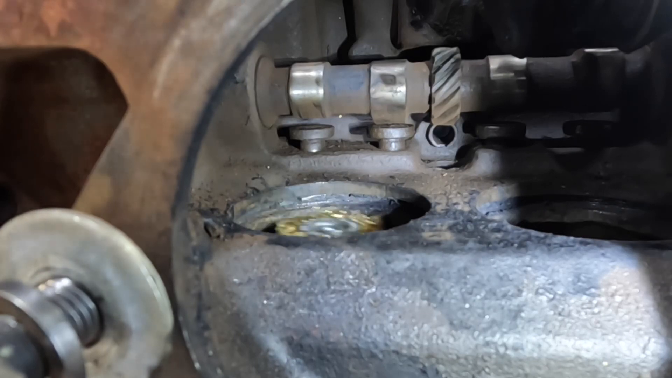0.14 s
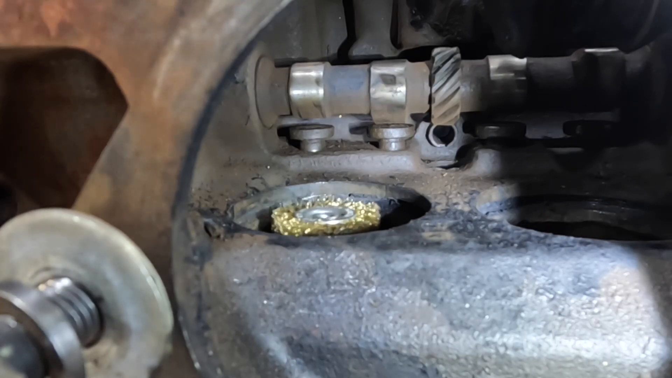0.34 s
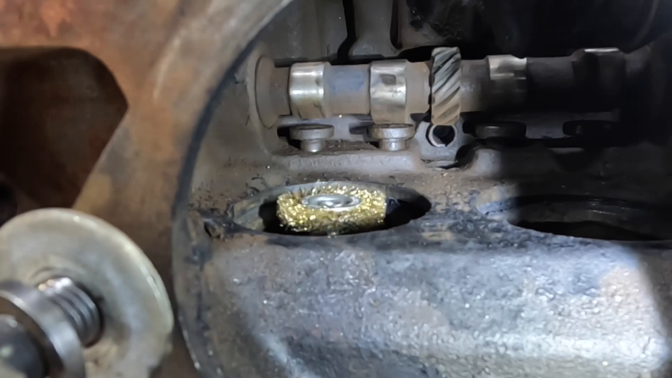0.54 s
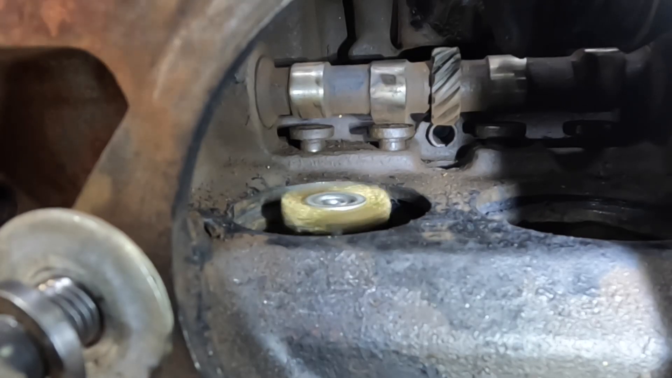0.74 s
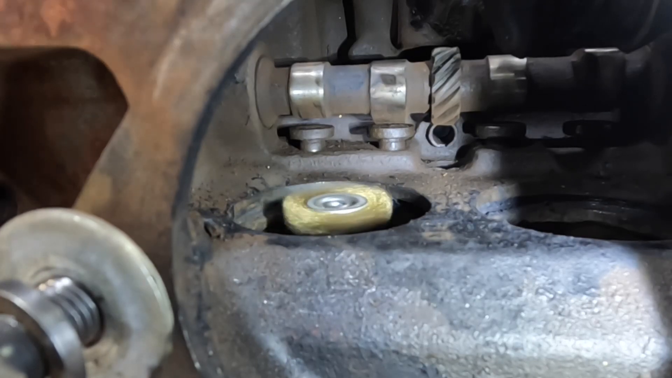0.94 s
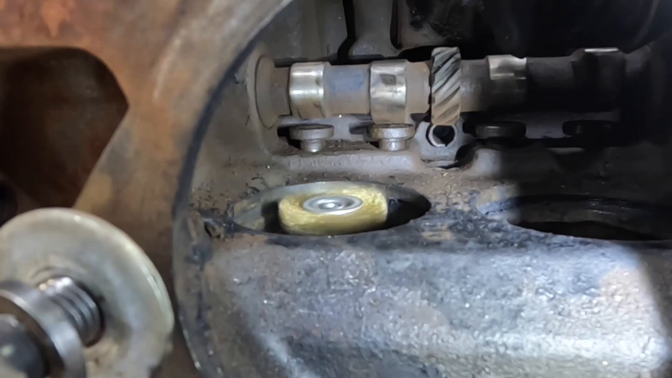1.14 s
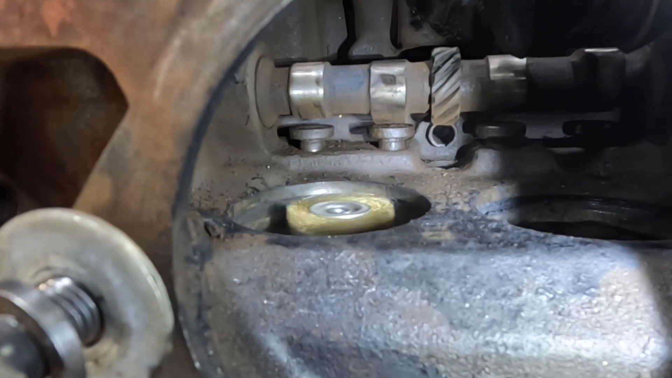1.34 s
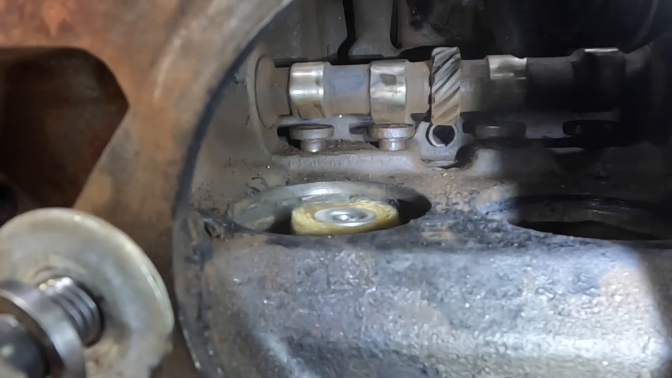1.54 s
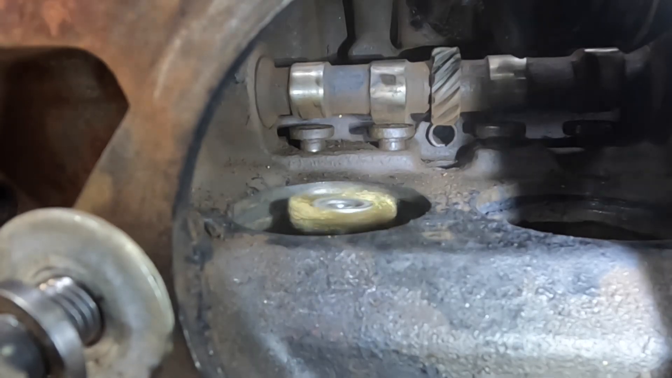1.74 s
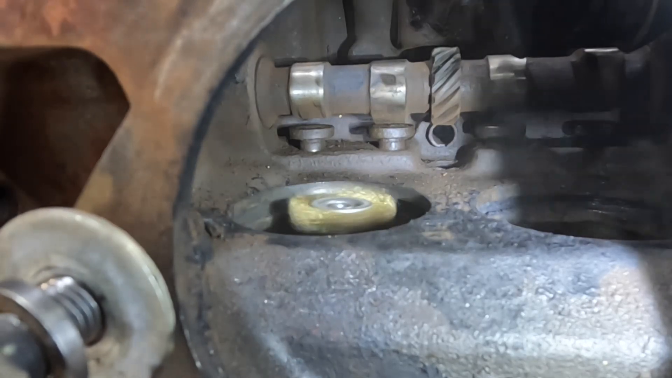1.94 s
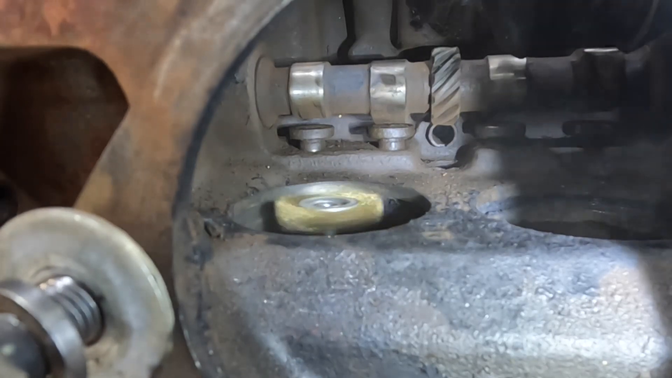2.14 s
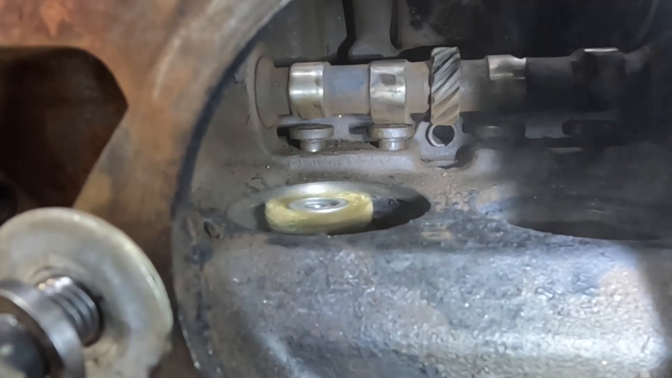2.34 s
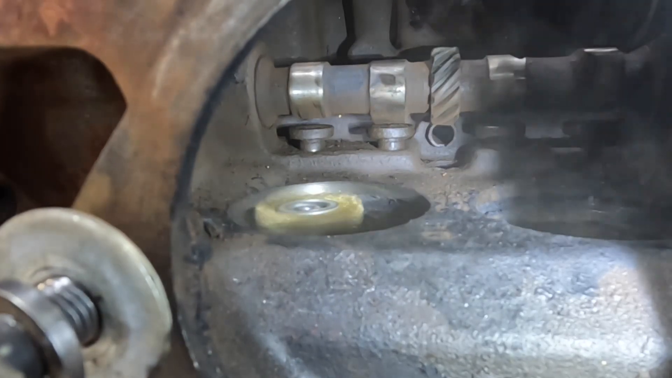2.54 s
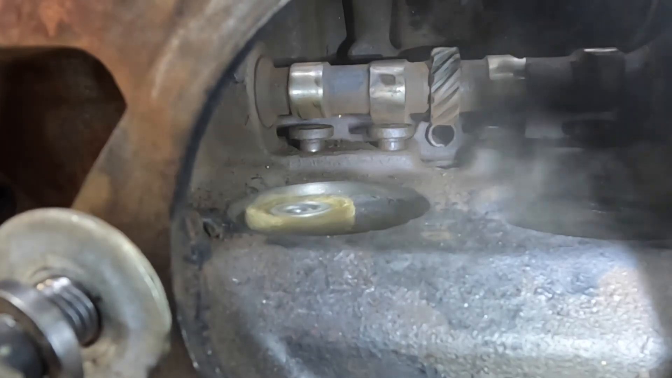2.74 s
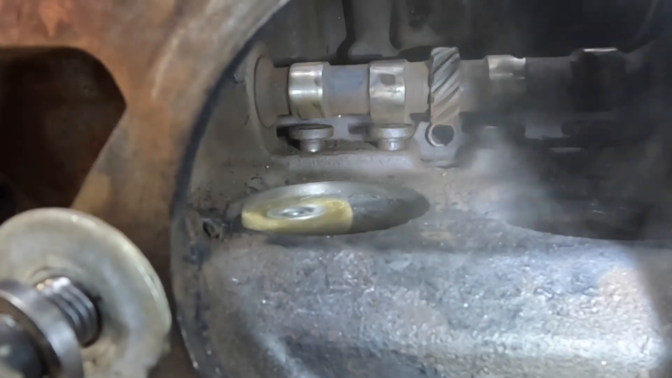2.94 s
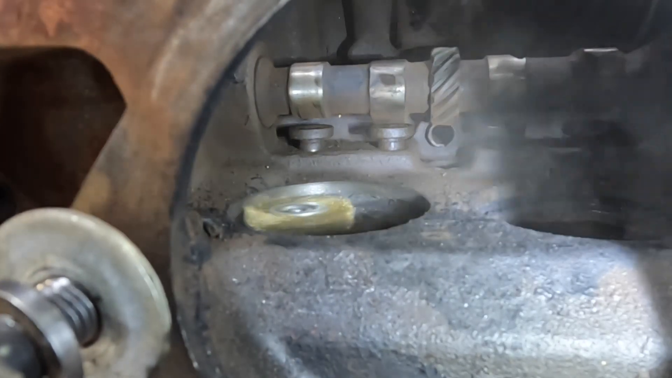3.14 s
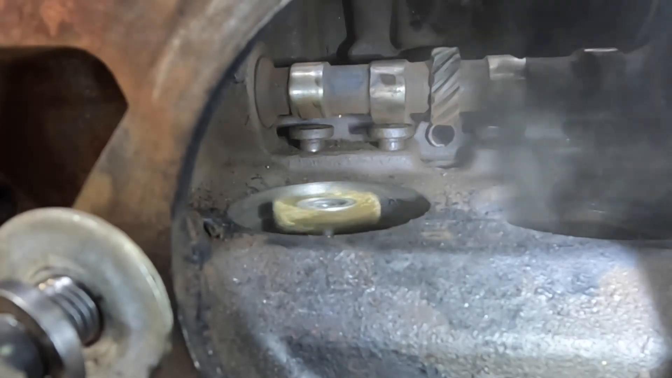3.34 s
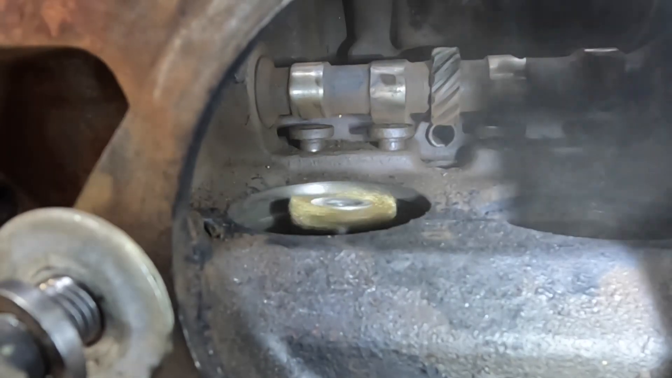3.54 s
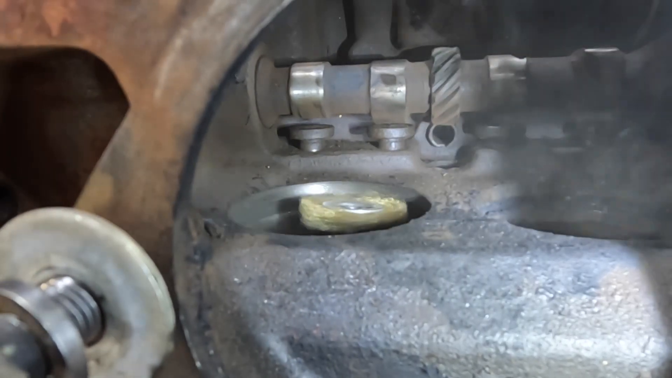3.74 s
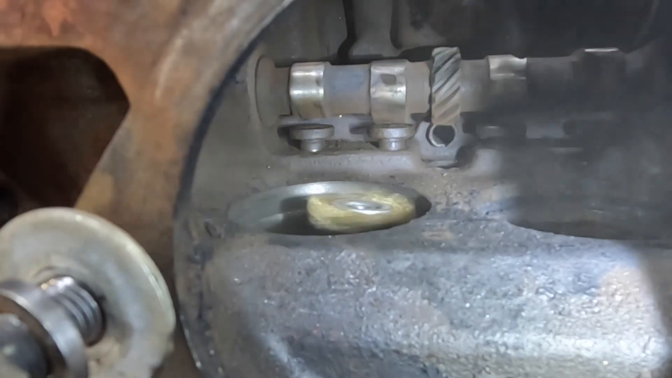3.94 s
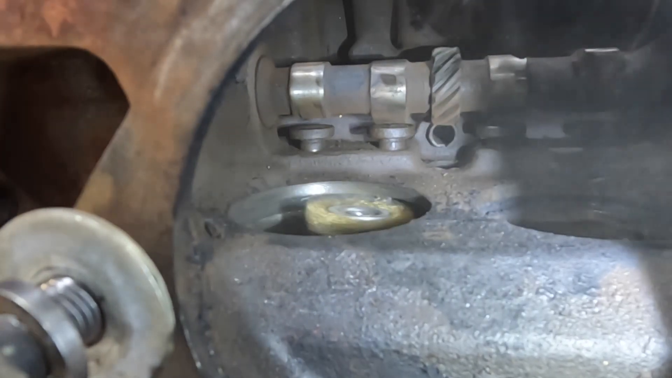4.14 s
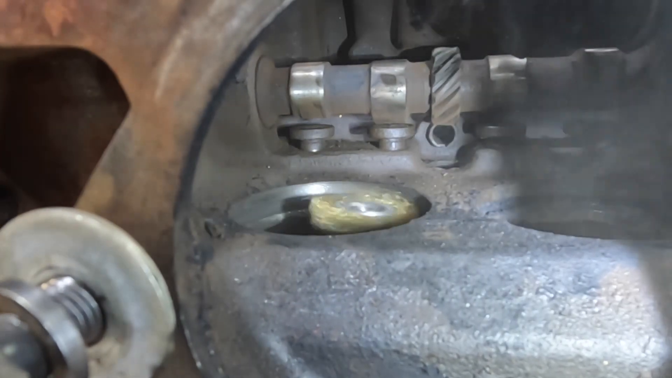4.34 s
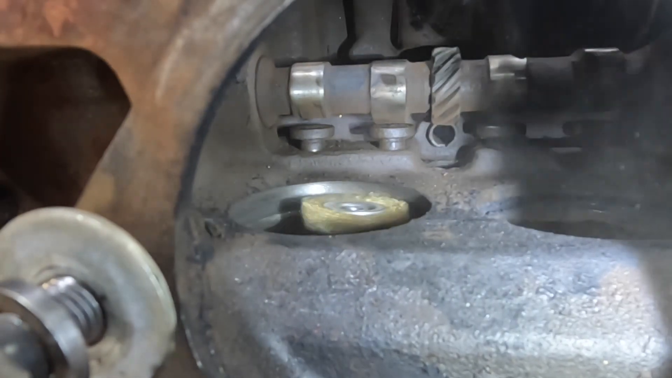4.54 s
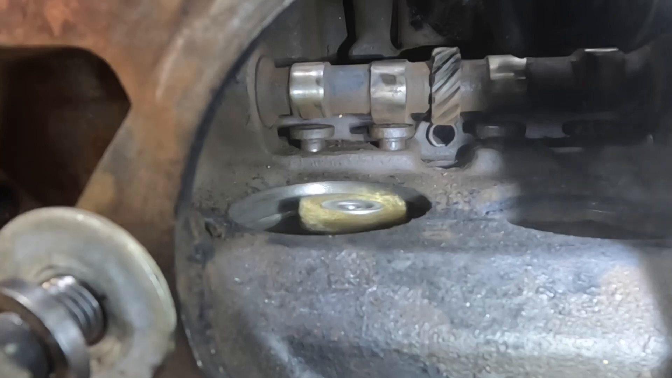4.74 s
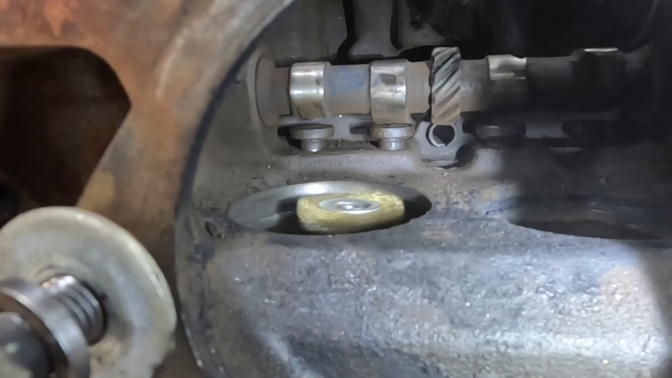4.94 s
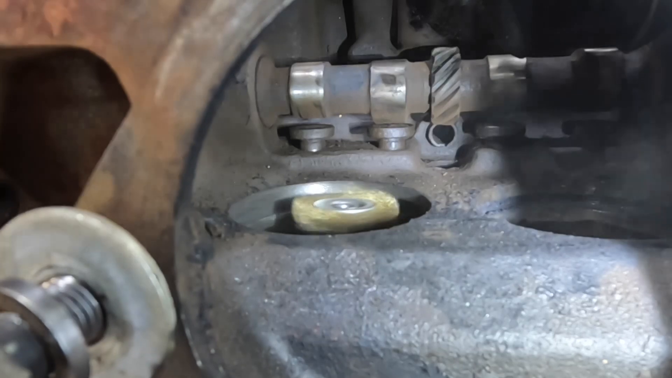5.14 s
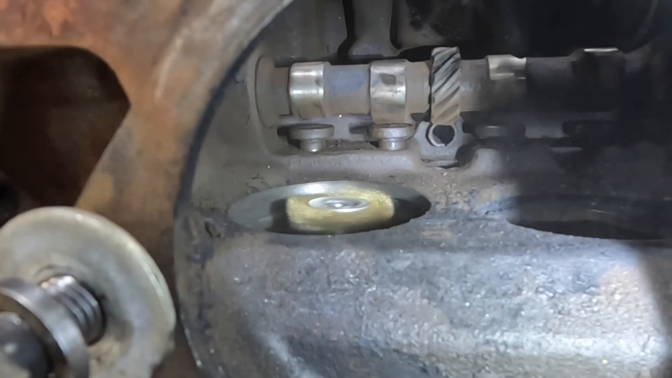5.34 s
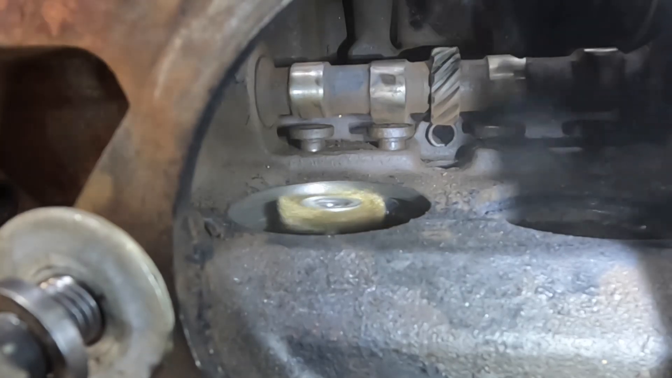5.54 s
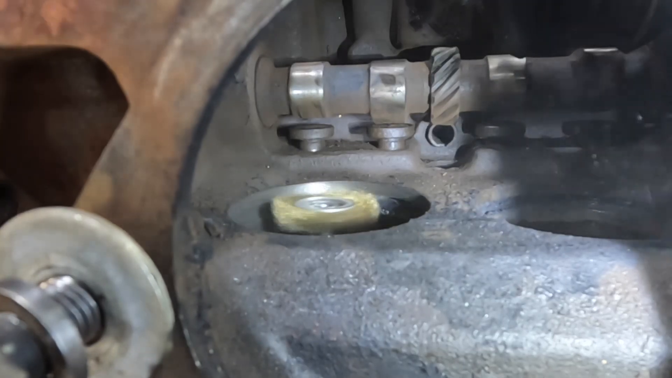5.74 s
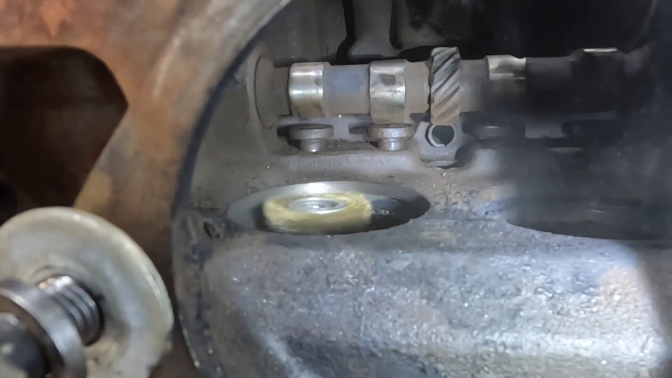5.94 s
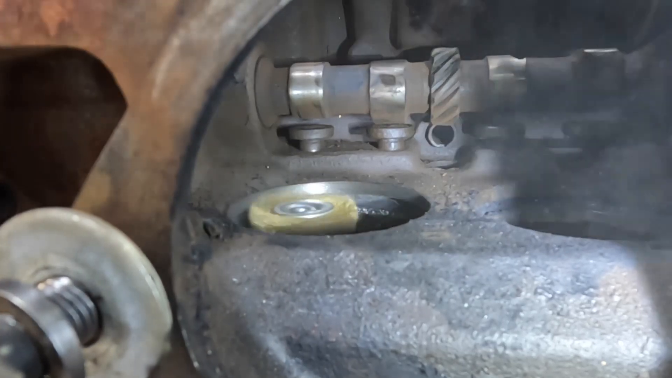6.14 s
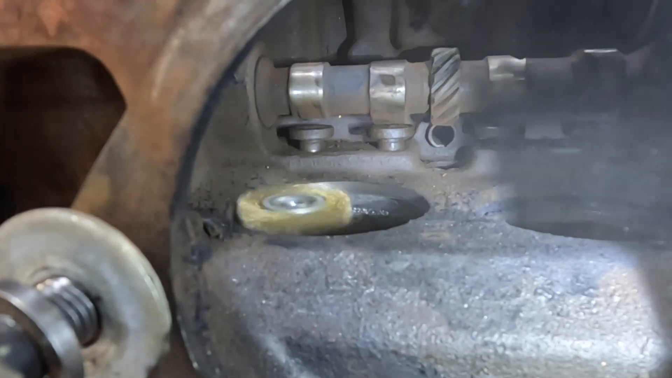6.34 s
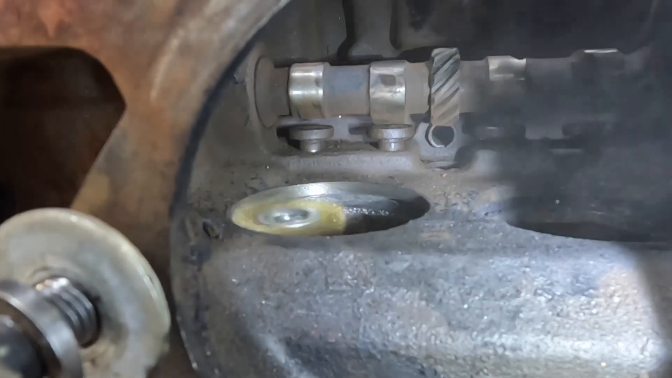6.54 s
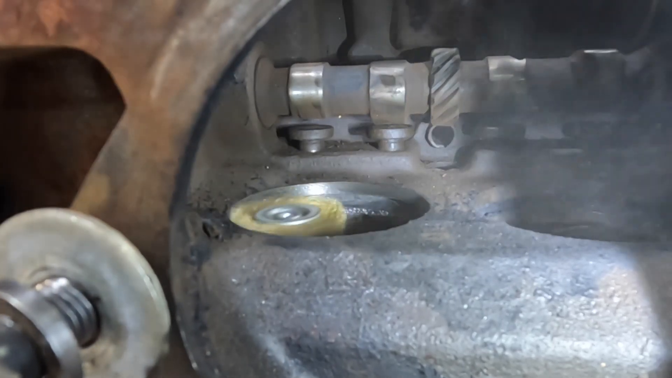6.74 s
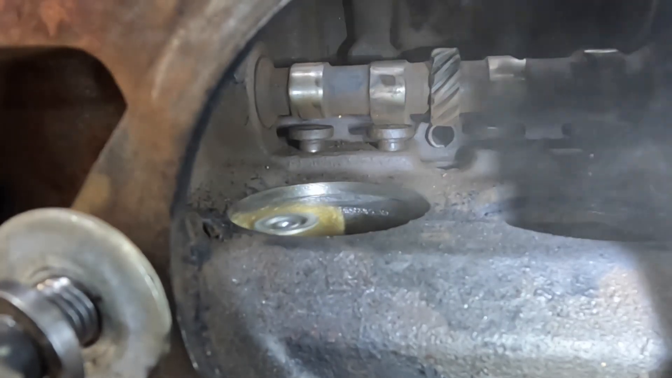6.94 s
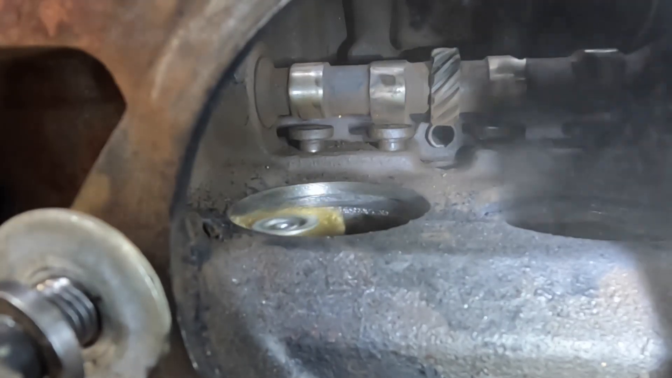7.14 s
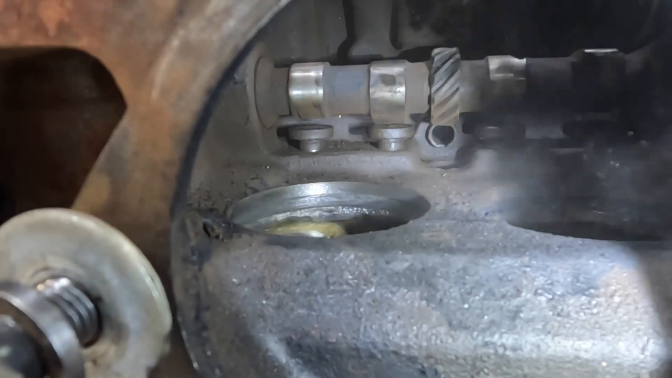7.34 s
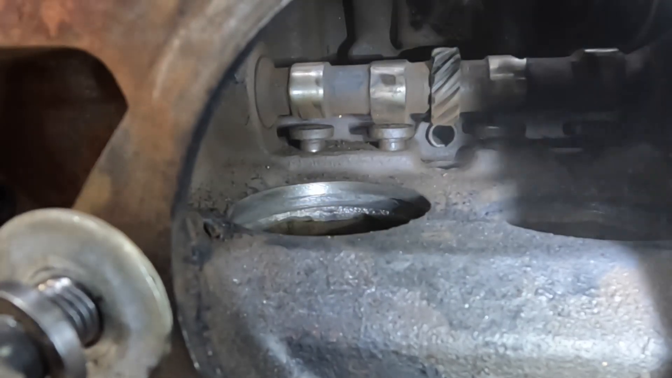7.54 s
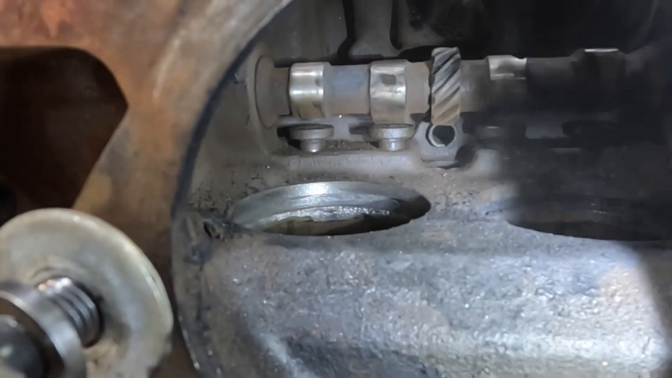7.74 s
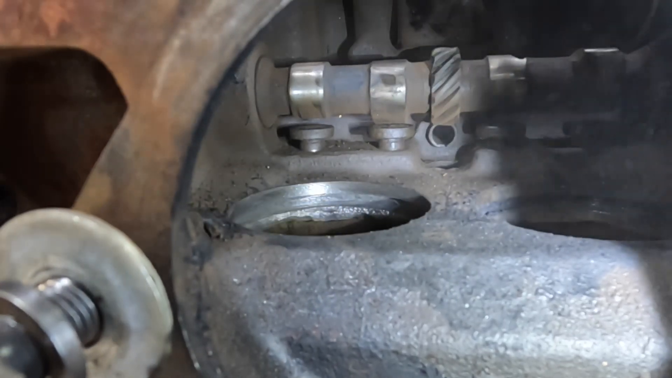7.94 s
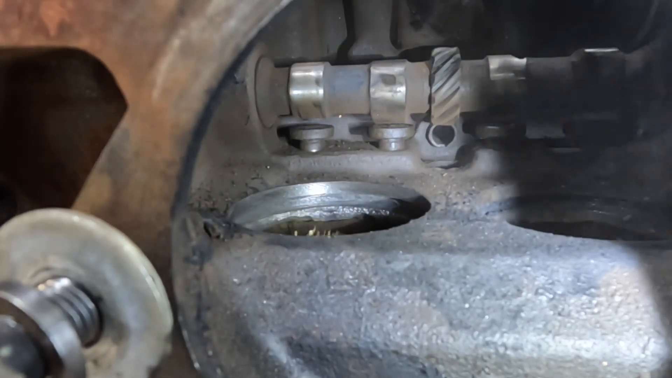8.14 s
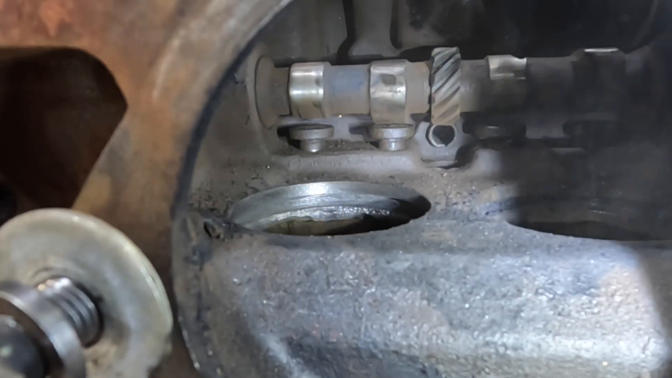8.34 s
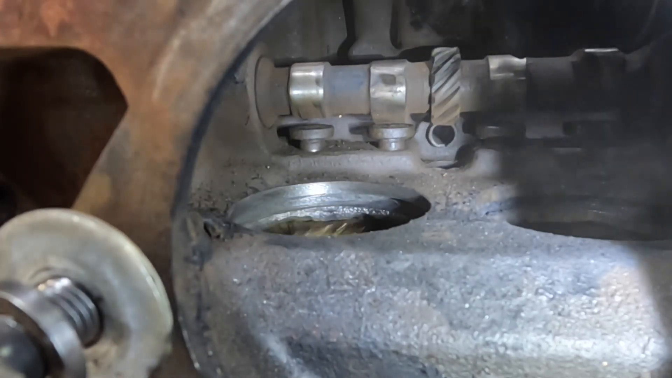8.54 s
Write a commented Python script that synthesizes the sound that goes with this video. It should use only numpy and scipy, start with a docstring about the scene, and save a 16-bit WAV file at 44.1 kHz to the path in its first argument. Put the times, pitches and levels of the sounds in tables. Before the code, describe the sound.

A close microphone in a reverberant workshop with soft low background noise. From 0 to 0.6 seconds, a wire brush makes small, dry, dull ticks against iron, with short gritty bristle scrapes at about 0.3 and 0.55. At 0.62 the air valve opens with a low puff, a few soft bumps of air and a brief low rush, stronger at right. A pneumatic drill instantly whines, a stack of high tones over dense exhaust hiss, brightest with scratch in the first second. The pitch rises quickly, then sags by about 3 seconds and wavers under load until 7.5, its tones trading strength while narrow noisy metallic rings swell and fade. At 7.51 it shuts off: the tone falls in a rapid chirp under 0.2 seconds, ringing out in an echo of about a second. Near 8.4 come two very faint touches over quiet background.

```python
"""A small wire brush in an air drill taps and scrapes the bore of an iron engine block in a workshop.
The valve opens with a puff and a brief low rush; the four-vane rotor whines as a stack of tones over
coloured exhaust noise, bright bristle scratch and narrow noisy rings, sagging in pitch under load.
At shut-off the vane tone drops in one falling chirp that rings out in the shop's noise-tail echo;
a last pair of faint touches follows over the background noise."""
import sys
import numpy as np
from scipy import signal
from scipy.fft import rfft, irfft, next_fast_len
from scipy.io import wavfile

SR = 44100
rng = np.random.default_rng(int(sys.argv[2]) if len(sys.argv) > 2 else 0)


def master_out(mix):
    """Clip the mix to full scale and print it as 16-bit PCM to the path in sys.argv[1]."""
    frames = np.transpose(np.atleast_2d(mix))
    ceiling = np.clip(frames, -1, 1)
    pcm = np.round(ceiling * 32767).astype(np.int16)
    wavfile.write(sys.argv[1], SR, pcm)


N = 378366
SIZE = next_fast_len(N)
VALVE_OPEN_S, VALVE_SHUT_S = .62, 7.514


def amp(db):
    """dB to gain."""
    return 10 ** (np.asarray(db) / 20)


def rms_one(x):
    """Scale to rms 1."""
    return x / np.sqrt(np.mean(x ** 2) + 1e-20)


def in_time(rows):
    """Columns of a timed table, interpolated to every sample."""
    s, *columns = np.transpose(rows)
    return [np.interp(np.arange(N) / SR, s, column) for column in columns]


def at_hz(points, hz):
    """Read a table on a log-frequency axis."""
    table = np.array(points)
    return np.interp(np.log(hz + 1), np.log(table[:, 0]), table[:, 1])


def drift(rate_hz):
    """Slow chance of spread 1: noise through two equal one-pole low-passes at every 40th sample."""
    r = np.exp(-80 * np.pi * rate_hz / SR)
    white = rng.standard_normal(N // 40 + 2002)
    slow = signal.lfilter([1], [1, -2 * r, r * r], white)[2000:]  # the filter has settled by then
    return np.interp(np.arange(N) / 40, np.arange(len(slow)), rms_one(slow))


def ring(clicks, hz, t60):
    """Two-pole resonator: a unit click sets a decaying sine of starting height 1 ringing."""
    r, w = amp(-60 / (t60 * SR)), 2 * np.pi * hz / SR
    return signal.lfilter([0, np.sin(w)], [1, -2 * r * np.cos(w), r * r], clicks + 1e-18)


def butter(x, edge_hz, kind="low"):
    """Gentle second-order filter."""
    return signal.sosfilt(signal.butter(2, edge_hz, kind, fs=SR, output="sos"), x)


def bands(length, low_hz, step):
    """Overlapping windows, step octaves apart, summing to 1: (centre Hz, window)."""
    hz = np.fft.rfftfreq(length, 1 / SR)
    place = np.log2(np.maximum(hz, low_hz) / low_hz) / step
    for k in range(int(place[-1]) + 2):
        yield low_hz * 2 ** (k * step), np.cos(np.pi / 2 * np.clip(place - k, -1, 1)) ** 2


def coloured(colour, modes=()):
    """Spectrum of a noise of rms 1, shaped by a colour curve and lifted at each mode."""
    hz = np.fft.rfftfreq(SIZE, 1 / SR)
    db = at_hz(colour, hz)
    for f, width, lift in modes:
        db = db + lift / (1 + (2 * (hz - f) / width) ** 2)
    white = rfft(rng.standard_normal(SIZE))
    return rfft(rms_one(irfft(amp(db) * white, SIZE)))


def background():
    """Coloured background noise, sinking at first, rising at the end, with small wandering."""
    # Colour of the shop. Each row: frequency in Hz, relative density in dB.
    shop_colour = [(15, -36), (25, -3), (99, -10.5), (136, -8), (183, -12), (322, -15), (359, -14.5),
                   (410, -21), (919, -37.5), (1140, -29), (1950, -38), (6210, -41.5), (15500, -67.5)]
    # Loudness of the shop. Each row: time in seconds, level in dB.
    shop_level = [(0, -40), (.45, -46.5), (.62, -49), (8.0, -50), (8.3, -53), (8.58, -45.5)]
    [level_db] = in_time(shop_level)
    return irfft(coloured(shop_colour), SIZE)[:N] * amp(level_db + 2.0 * drift(12))


def knocks(chatter_s=0.0056, contact_db=-26.5):
    """Each touch of the shank is a short chatter of contacts that strikes every mode of the iron."""
    # Brush shank touching the iron. Each row: start in seconds, relative level in dB,
    # extra lift in dB of the modes above 5500 Hz.
    touches = [(0.0593, -33.5, -18), (0.0844, -41.5, -15.5), (0.19, -31.5, -12.5), (0.267, -36.5, -13.5),
               (0.3731, -41, 7.5), (0.3894, -47, -9.5), (0.5357, -40.5, -8), (0.561, -42.5, -1.5),
               (8.4173, -39, -18), (8.429, -37.5, -19)]
    # Modes of the iron. Each row: frequency in Hz, relative level in dB, T60 in seconds.
    iron_modes = [(1180, -5, .012), (1900, -1, .012), (2480, -3, .01), (3080, -6.5, .008), (3850, -6, .008),
                  (4400, -7.5, .007), (5000, -7, .008), (5670, -4.5, .006), (6300, -5, .007),
                  (7500, 3.5, .007), (8600, -5.5, .004)]
    out, t = np.zeros(N), np.arange(900) / SR
    chatter = rng.standard_normal((len(touches), len(t))) * np.exp(-t / chatter_s)
    for hz, mode_db, t60 in iron_modes:
        push = np.zeros(N)
        for (s, touch_db, bright_db), contacts in zip(touches, chatter):
            db = touch_db + mode_db + contact_db + (hz > 5500) * bright_db
            push[round(s * SR):][:len(t)] += amp(db) * contacts
        out += ring(push, hz, t60)
    return butter(out, 9000)


def drag(grain_db=3):
    """Bristles dragged along the wall: grainy coloured noise that swells and fades per stroke."""
    # Strokes. Each row: swell start, loudest point and fade end in seconds, level in dB.
    strokes = [(0.25, .32, .375, -47.5), (0.531, 0.536, .556, -46.5), (0.547, 0.564, .62, -50),
               (8.4, 8.422, 8, -69.5)]
    # Colour of the scratch. Each row: frequency in Hz, relative density in dB.
    scratch_colour = [(530, -66.5), (900, -32), (1240, -3.5), (2420, -9), (2570, -8.5), (7490, -2.5),
                      (12400, -20), (15000, -43.5)]
    t, envelope = np.arange(N) / SR, 0
    for start, top, end, db in strokes:
        envelope = envelope + amp(db) * np.interp(t, (start, top, end), (0, 1, 0)) ** .7
    noise = irfft(coloured(scratch_colour), SIZE)[:N]
    return envelope * noise * amp(grain_db * drift(150))


def valve(lag_s=0.):
    """Seconds since the valve opened, and a gate that is open while air flows."""
    t = np.arange(N) / SR - VALVE_OPEN_S
    to_nearest_edge = np.minimum(t - lag_s, VALVE_SHUT_S - VALVE_OPEN_S - t)
    return np.maximum(t, 0), np.clip(to_nearest_edge / .0012, 0, 1)


def puffs():
    """Short low pushes of air on the microphone, each a click into a fast-dying resonance."""
    # Air pushes. Each row: start in seconds, relative level in dB, pitch in Hz, T60 in seconds.
    pushes = [(.6215, -15, 1100, .008), (.621, -8, 468, 0.014), (.632, -1.5, 170, 0.014),
              (.657, -13.5, 118.8, .03), (0.695, -16, 80.6, 0.041), (.722, -22.5, 70, .05),
              (0.762, -8, 60, 0.033), (0.799, -15.5, 60, 0.041), (.84, -20, 50, .06),
              (7.511, -22, 60.3, 0.038)]
    out = np.zeros(N)
    for s, db, hz, t60 in pushes:
        click = np.zeros(N)
        click[round(s * SR)] = amp(db)
        out += ring(click, hz, t60)
    return butter(out, 1500)


def buffet(start_db=-30, fade_db_per_s=33.5, lumps_db=4):
    """Exhaust air buffeting the microphone: lumpy low noise that fades after the start."""
    since, gate = valve()
    low = butter(rng.standard_normal(N), [35, 330], "band")
    return gate * amp(start_db - fade_db_per_s * since + lumps_db * drift(30)) * rms_one(low)


def fine_ripple(spectrum, ripple_db=4.5, spacing_hz=110, hold_s=1.064):
    """Fine random ripple in the noise spectrum, crossfading slowly between chance patterns."""
    hz, t, out = np.fft.rfftfreq(SIZE, 1 / SR), np.arange(SIZE) / SR, 0
    chance = rng.standard_normal((14, 600))
    for k in range(int(t[-1] / hold_s) + 2):
        pattern = np.interp(hz / spacing_hz, np.arange(600), chance[k])
        pattern = pattern * np.clip(hz / 2500, 0, 1)  # weaker ripple in the lows
        share = np.clip(1 - np.abs(t / hold_s - k), 0, 1)  # crossfade between patterns
        out = out + share * irfft(spectrum * amp(ripple_db * pattern), SIZE)
    return rfft(rms_one(out))


def air(patchy_db=1.0, flicker_db=0.48, scratch_from_hz=4800, scratch_full_hz=7400):
    """Exhaust hiss and bristle scratch: rushing noise whose narrow bands swell and fade separately."""
    # Exhaust and bristles. Each row: time in seconds, hiss level in dB, then low rush,
    # bright scratch and top fizz in dB, of which only the swing about the median counts.
    air_levels = [(.68, -22, -7.5, 1, -17), (1.2, -25.5, -2.5, -5, -13), (1.55, -22, -3.5, -9.5, -14.5),
                  (1.8, -21, -8, -16, -15.5), (3.1, -20, -7.5, -15, -20.5), (3.6, -21, -6.5, -15, -16),
                  (4.6, -22, -5.5, -10.5, -15.5), (5.8, -20, -9, -15, -18.5),
                  (6.7, -21.5, -6.5, -13.5, -19.5), (7.5, -20.5, -7, -13, -17)]
    # Colour of the hiss. Each row: frequency in Hz, relative density in dB.
    hiss_colour = [(18, -51.5), (30, -20), (187, -11.5), (292, -8), (693, -11), (1170, -3.5), (1410, -8),
                   (1690, -5), (2030, -11.5), (2310, -2), (3250, -0.5), (5770, -8.5), (8330, -19),
                   (13000, -20), (15600, -29)]
    # Resonances of the housing. Each row: frequency in Hz, width in Hz, lift in dB.
    housing_modes = [(355, 160, 4), (510, 24, 3.5), (995, 23, 1.5), (3295, 280, 5), (4070, 230, 5.5),
                     (5460, 790, 2.5), (6890, 520, 6), (10200, 200, 3), (13060, 450, 10)]
    # as the valve opens: slight dip of all the air, strong brief lift of the low rush
    opening_db, opening_low_db, opening_decay_s = -1.5, 11.5, 0.058
    since, gate = valve()
    hiss_db, *parts_db = in_time(air_levels)
    opening = np.exp(-since / opening_decay_s)
    low_db, bright_db, top_db = (part - np.median(part) for part in parts_db)
    noise = fine_ripple(coloured(hiss_colour, housing_modes))
    together, out = drift(11.0), 0
    for hz, window in bands(SIZE, 120, 1 / 6):
        if hz < 2000:
            part_db = low_db + opening_low_db * opening
        elif hz > 11500:
            part_db = top_db
        else:
            scratch = np.log(hz / scratch_from_hz) / np.log(scratch_full_hz / scratch_from_hz)
            part_db = np.clip(scratch, 0, 1) * bright_db
        db = part_db + patchy_db * drift(2.1) + flicker_db * together
        out = out + amp(db) * irfft(noise * window, SIZE)[:N]
    return gate * amp(hiss_db + opening_db * opening) * out


def narrow_rings(flutter_db=1.2):
    """Narrow noisy rings: noise twice through a resonance, swelling, fading and fluttering."""
    # Short rings as the valve opens, then longer ones during the scraping.
    # Each row: start and end in seconds, frequency in Hz, width in Hz, level in dB.
    ring_rows = [(.612, .665, 2450, 200, -23), (.61, .66, 1150, 220, -26), (.62, 1.2, 3250, 200, -35),
                 (0.53, 1.34, 7360, 200, -31), (0.55, 1.2, 8800, 150, -39), (.6, 1.2, 10300, 400, -32),
                 (0.63, 1.62, 4250, 100, -35.5), (2.2, 2.7, 4600, 170, -30.5), (2.6, 2.8, 3250, 160, -33),
                 (2.8, 4.67, 3984, 180, -27), (3.7, 4.894, 2930, 80, -27), (4.3, 5.9, 5740, 220, -33),
                 (3.7, 5.3, 9100, 300, -41.5), (3.4, 5.8, 13150, 300, -41), (4.7, 6.72, 4130, 160, -26.5),
                 (7.5, 7.5, 4220, 110, -32.5), (6.7, 7.4, 4650, 120, -31), (6.9, 7.55, 5500, 130, -49)]
    out = np.zeros(N)
    for start, end, hz, width_hz, db in ring_rows:
        i, j = round(start * SR), round(end * SR)
        noise = rng.standard_normal(3 * SR)[:j - i]
        for _ in range(2):
            noise = ring(noise, hz, 1.4 / width_hz)  # two passes together give the stated width
        out[i:j] += amp(db) * rms_one(noise) * np.hanning(j - i) ** .5
    return out * valve()[1] * amp(flutter_db * drift(35))


def motor(rough_db=1.0, unbalance_db=3.0, waver=.0012, fading_db=1.2):
    """Exhaust pulses of the vanes as tones; upper ones sway once per chuck turn, rotor tones are unsteady."""
    # Vane motor under changing load. Each row: time in seconds, vane rate in Hz,
    # 2nd and 3rd vane multiple in dB.
    load = [(.63, 1170, -33.5, -35), (.67, 1187, -22.5, -37), (.71, 1312, -26.5, -38.5),
            (.87, 1295, -30.5, -34), (.95, 1287, -24, -37.5), (1.13, 1250, -24, -46),
            (1.38, 1219, -24, -45), (1.46, 1229, -30, -26.5), (1.58, 1224, -27, -38),
            (1.72, 1195, -27, -26.5), (1.79, 1237, -28.5, -25.5), (1.86, 1212, -28.5, -25),
            (2.16, 1188, -21, -32), (2.68, 1142, -30.5, -26), (2.87, 1160, -30.5, -27),
            (2.97, 1129, -40, -28.5), (3.32, 1147, -33, -26), (3.42, 1184, -23.5, -26.5),
            (3.58, 1199, -26.5, -29), (3.74, 1145, -26, -27.5), (3.94, 1151, -26, -27.5),
            (4.01, 1165, -40, -27), (4.19, 1152, -21.5, -29), (4.33, 1161, -37, -26),
            (4.52, 1166, -36, -27), (4.55, 1136, -22.5, -34), (4.62, 1125, -22.5, -38.5),
            (4.94, 1109, -25, -25.5), (5.4, 1129, -29, -27.5), (5.6, 1118, -32.5, -25.5),
            (6.09, 1133, -30, -25), (6.22, 1183, -20, -30), (6.45, 1196, -24, -25.5),
            (6.65, 1168, -22.5, -28.5), (6.83, 1186, -21.5, -29.5), (6.92, 1152, -30.5, -23.5),
            (7.15, 1166, -26.5, -24.5), (7.44, 1177, -24, -30.5), (7.5, 1242, -28, -37)]
    # Weaker tones. Each row: time in seconds, then levels in dB of the vane tone, 3rd rotor multiple,
    # gear mesh at five thirds of the vane rate, 4th vane multiple.
    weak_tones = [(.63, -42, -47.5, -46.5, -51.5), (1.1, -37, -50.5, -34, -51),
                  (1.6, -29, -46.5, -45, -37.5), (2.6, -35.5, -45.5, -54.5, -61.5),
                  (3.6, -32.5, -42.5, -47.5, -49), (4.45, -27.5, -33.5, -43, -44),
                  (4.7, -36, -35, -55.5, -48.5), (6.0, -38.5, -39, -49.5, -44),
                  (6.4, -38.5, -51, -49, -41.5), (7.51, -34.5, -54.5, -47, -41.5)]
    # Steady upper tone. Each row: multiple of the vane rate, level in dB.
    faint_orders = [(6, -52)]
    rotor_db = -46  # once-a-turn tone: four vanes, so a quarter of the vane rate
    chuck_ratio, wobble = .0315, .25  # chuck turns per vane pulse; sway depth before chance scales it
    vane_hz, *levels = in_time(load)
    pulses = np.cumsum(vane_hz * (1 + waver * drift(20.0))) / SR
    orders = list(zip((2, 3), levels))
    orders += list(zip((1, 3 / 4, 5 / 3, 4), in_time(weak_tones)))
    orders += [(1 / 4, rotor_db)] + faint_orders
    out = 0
    for k, db in orders:
        depth = wobble * (k >= 2) * np.clip(.8 + .6 * drift(1.2), 0, 2.5)
        sway = 1 + depth * np.sin(2 * np.pi * (chuck_ratio * pulses + rng.random()))
        unsteady_db = (rough_db if k >= 1 else unbalance_db) * drift(25) + fading_db * drift(4.5)
        out = out + amp(db + unsteady_db) * sway * np.sin(2 * np.pi * (k * pulses + rng.random()))
    return np.sqrt(2) * valve(lag_s=.01)[1] * out


def swell(hz, mode_hz, width_hz, db):
    """Gain of a tone as it crosses a resonance."""
    return amp(db) / (1 + (2 * (hz - mode_hz) / width_hz) ** 4)


def run_down(rasp=.1):
    """The last vane pulses slow down, loud with the back pressure gone, swelling at each resonance."""
    # Resonances woken by the run-down. Each row: frequency in Hz, width in Hz, level in dB.
    exhaust_modes = [(250, 90, -21), (390, 70, -11), (535, 130, -10.5), (670, 90, -16), (815, 45, -13),
                     (970, 120, -10.5)]
    # Where the 3rd multiple is heard: frequency in Hz, width in Hz, level in dB.
    overtone_mode = (1350, 380, -26)
    # vane rate at shut-off; it slows by air drag (in proportion to the rate) and by constant friction
    start_hz, drag_per_s, friction_hz_per_s = 1070, 6, 11500
    since = np.arange(N) / SR - VALVE_SHUT_S
    brake_hz = friction_hz_per_s / drag_per_s
    hz = (start_hz + brake_hz) * np.exp(-drag_per_s * np.maximum(since, -.01)) - brake_hz
    hz = np.clip(hz, 0, None)
    phase = 2 * np.pi * np.cumsum(hz) / SR
    tone = sum(swell(hz, *mode) for mode in exhaust_modes) * np.sin(phase)
    tone = tone + swell(3 * hz, *overtone_mode) * np.sin(3 * phase)
    fade_in = np.clip(1 + since / 0.0072, 0, 1)  # full at the moment of shut-off
    return np.sqrt(2) * fade_in * tone * (1 + rasp * drift(260))


def shop_echo(x, tail_db=-16.5):
    """Dull first reflections, then a tail of noise dying band by band."""
    # Tail of the shop. Each row: frequency in Hz, T60 in seconds, relative level in dB.
    echo_bands = np.array([(100, 0.73, -5.5), (600, 1.21, 0.5), (1100, 1.02, 4.5), (1600, 1.0, 0.5),
                           (2500, 1.135, 2), (5000, 0.97, -5), (9000, 0.5, -1), (15000, 0.18, -5.5)])
    # First reflections. Each row: delay in seconds, level in dB.
    reflections = [(.021, -14), (.041, -17.5), (.062, -21)]
    length = int(1.6 * SR)
    t, white, tail = np.arange(length) / SR, rfft(rng.standard_normal(length)), 0
    for hz, window in bands(length, 60, 2 / 3):
        db = at_hz(echo_bands[:, ::2], hz) - 60 * t / at_hz(echo_bands, hz)
        tail = tail + irfft(white * window, length) * amp(db)
    # scaled to unit energy ahead of the 20 ms fade-in
    tail = amp(tail_db) * tail * np.clip(t / .02, 0, 1) / np.sqrt(np.sum(tail ** 2))
    dull = butter(x, 1500)
    early = sum(amp(db) * np.pad(dull, (round(s * SR), 0))[:N] for s, db in reflections)
    return early + signal.fftconvolve(x, tail)[:N]


def steep(x, edge_hz, kind):
    """Steep filter, 70 dB down at its edge."""
    return signal.sosfilt(signal.cheby2(10, 70, edge_hz, kind, fs=SR, output="sos"), x)


def widen(mid, top_hz=10630, top_lean=.4):
    """Unlike part of the two channels: the same sound, each narrow band a few ms late, in four ranges."""
    # Stereo width over time: bass, middle and whine narrow to the centre, top stays wide.
    # Each row: time in seconds, then gain in dB of the unlike part for bass, middle,
    # band of the main whine (added to the middle), top.
    width_levels = [(0, -18, -2, -20, -2), (1.1, -10, -10.5, -6, 2), (1.35, -18, -56, -4, 3),
                    (1.65, -20, -70, -9, 2), (1.72, -20.5, -70, -72, 4.5), (7.5, -20, -70.5, -70, 4),
                    (7.6, -56, -70, -70, 3)]
    hz = np.fft.rfftfreq(SIZE, 1 / SR)
    spectrum = rfft(mid, SIZE)
    late_s = np.interp(hz / 40, np.arange(600), rng.uniform(.002, .02, 600))
    phase = 2 * np.pi * np.cumsum(late_s) * hz[1]  # the phase slope is the delay
    unlike = irfft(spectrum * np.exp(-1j * phase), SIZE)[:N]
    bass_db, middle_db, whine_db, top_db = in_time(width_levels)
    bass = steep(unlike, 1054, "low")
    middle = steep(steep(unlike, 518.5, "high"), 6500, "low")
    whine = steep(steep(middle, 1950, "high"), 3100, "low")
    top = steep(unlike, top_hz, "high")
    # the undelayed top, subtracted, leans the image right
    above = irfft(spectrum * np.clip((hz - 0.99 * top_hz) / 1200, 0, 1), SIZE)[:N]
    top = np.sqrt(1 - top_lean ** 2) * top - top_lean * above
    return amp(bass_db) * bass + amp(middle_db) * middle + amp(whine_db) * whine + amp(top_db) * top


def scene(whine_to_walls_db=-6):
    """Touches, drill, echo and background in stereo; the air on the microphone is stronger at right."""
    whine = motor()
    rest = knocks() + drag() + air() + narrow_rings() + run_down()
    # the exhaust faces the microphone, less whine reaches the walls
    echo = shop_echo(rest + amp(whine_to_walls_db) * whine)
    mid = whine + rest + echo + background()
    side = widen(mid)
    return mid + side * [[1], [-1]] + (puffs() + buffet()) * [[.75], [1.25]]


def record(dry, cutoff_hz=15700):
    """The top is cut by a steep low-pass."""
    return signal.sosfilt(signal.ellip(12, .5, 75, cutoff_hz, fs=SR, output="sos"), dry)


dry = scene()
out = record(dry)
master_out(out)
```